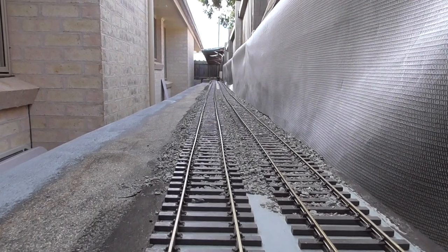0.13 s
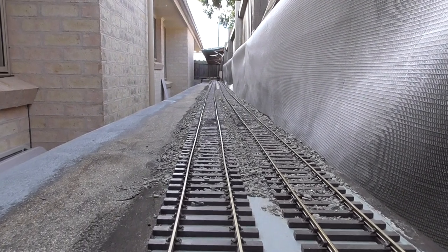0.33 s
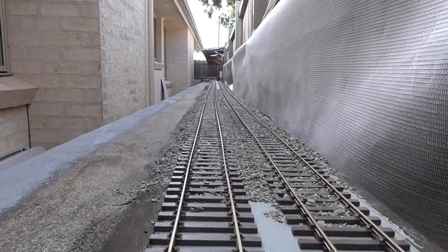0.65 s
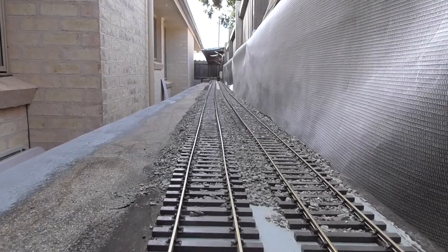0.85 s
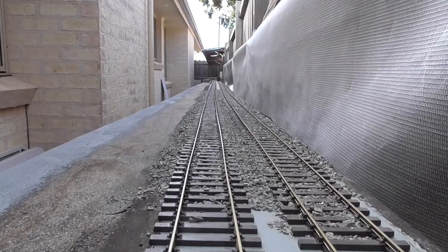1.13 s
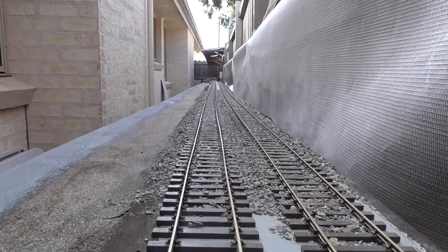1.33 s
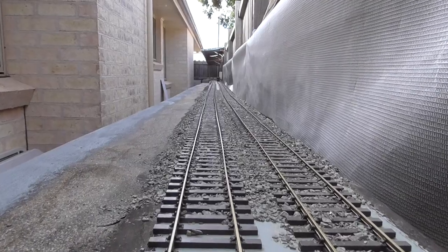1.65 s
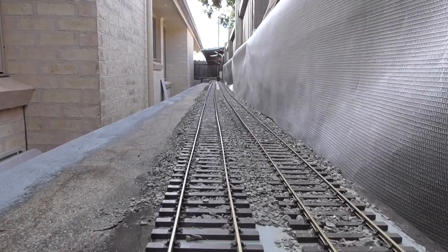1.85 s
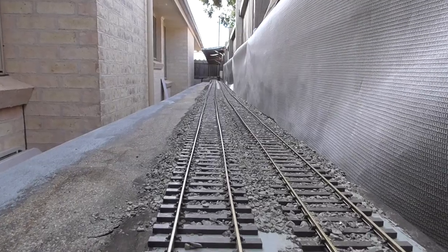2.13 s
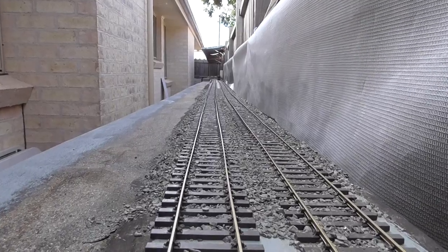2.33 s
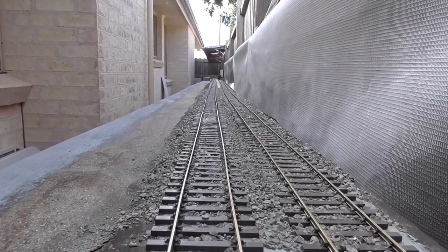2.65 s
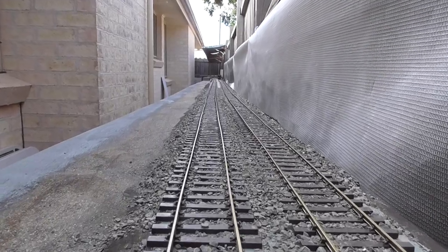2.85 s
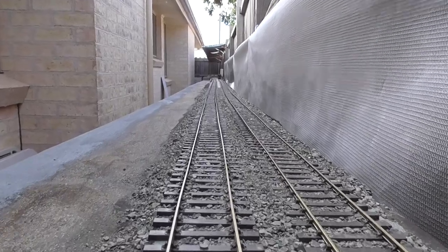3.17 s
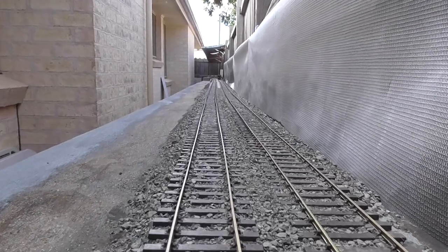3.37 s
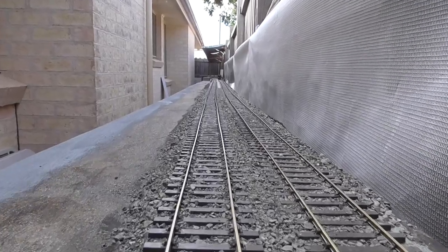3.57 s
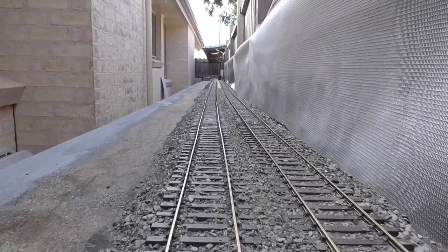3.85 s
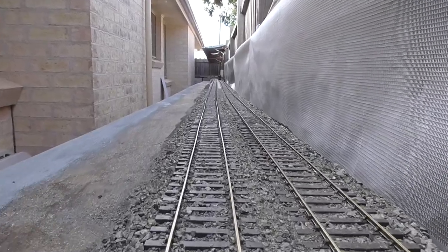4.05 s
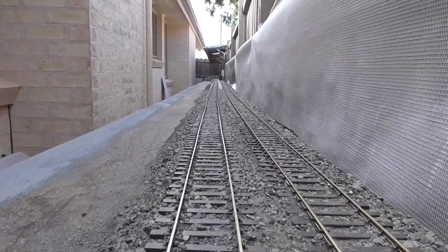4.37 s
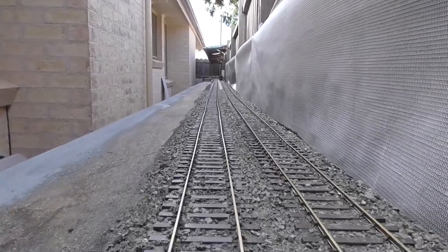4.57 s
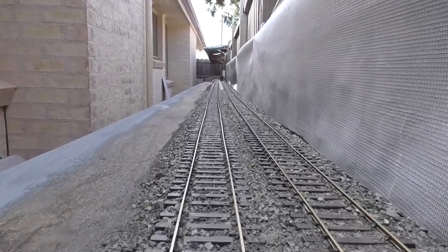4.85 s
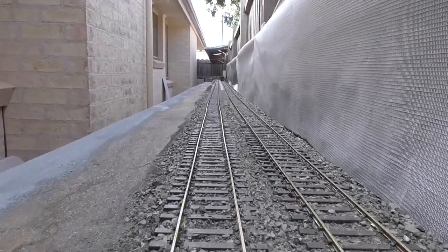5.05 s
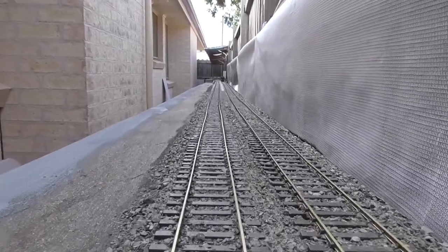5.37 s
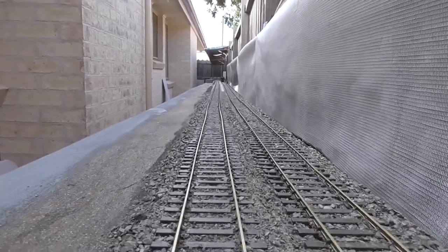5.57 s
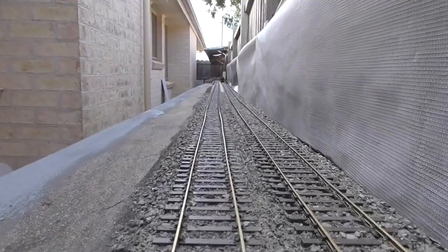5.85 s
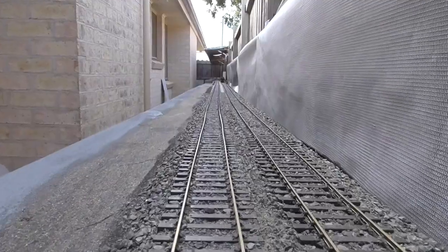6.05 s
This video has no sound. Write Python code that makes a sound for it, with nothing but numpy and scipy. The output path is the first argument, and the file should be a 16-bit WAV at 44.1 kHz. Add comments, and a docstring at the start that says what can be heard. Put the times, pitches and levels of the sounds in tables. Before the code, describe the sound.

Heard from aboard a miniature train, an engine purrs, revs up and settles while wheel rumble, gritty scrapes and metallic knocks steadily build.

```python
"""A garden track beside a brick wall: a small locomotive starts off, heard from a camera riding on the train.
Its engine, a sum of overtones of the working cycle, throbs at idle, pulls, then settles.
Filtered noise gives the wheels' rumble, louder through the wagon body as speed grows, and hissing grit.
Struck resonances give the knocks and ticks of couplings and rail joints; many small random blows give
a rolling noise. A steady faint low noise lies beneath; the camera adds hiss and a faint whine."""
import sys
import numpy as np
from scipy import signal
from scipy.fft import rfft, irfft, next_fast_len
from scipy.io import wavfile
from scipy.ndimage import uniform_filter1d

SR = 44100
rng = np.random.default_rng(int(sys.argv[2]) if len(sys.argv) > 2 else 0)


def pcm_store(signal):
    """Save signal as 16-bit PCM."""
    levels = np.round(np.clip(np.atleast_2d(signal), -1, 1) * 32767)
    wavfile.write(sys.argv[1], SR, levels.astype(np.int16).T)


N = 273861

# Levels of resonances and spectra are relative within their table.
# steady faint low noise: f/Hz, width/Hz, level/dB
LOW_NOISE = [(66, 34, 0)]
LOW_NOISE_DB = -61.5

# wheels: t/s, rumble level/dB, level of the ring near 2 kHz against the rumble/dB
ROLL = [(0.0, -41.5, -20.5), (1.17, -40.5, -19.5), (1.52, -35.5, -20.5), (2.0, -33, -22.5),
        (2.87, -31.5, -22.5), (3.13, -27.5, -23), (3.7, -28, -24), (3.95, -25.5, -22.5),
        (4.15, -22.5, -23.5), (4.6, -24, -21.5), (4.84, -20, -23.5), (5.05, -23, -22.5),
        (5.22, -22.5, -20.5), (5.45, -18.5, -21), (5.65, -21, -15.5), (5.86, -18.5, -19),
        (6.21, -21.5, -15.5)]
# response of the wagon body: f/Hz, level/dB
BODY = [(25, -65), (70, -25.5), (105, 0), (220, 1.5), (340, -3.5), (480, 1.5), (560, -4.5), (740, -5),
        (835, -8), (920, -8), (1100, -8), (1420, -14), (1680, -34.5), (2550, -42.5), (5000, -53),
        (16000, -56.5)]
# ringing of the wheels: f/Hz, width/Hz, level/dB
WHEEL_RING = [(1952, 230, 4), (2153, 140, -2)]
# booming of the wagon at speed: f/Hz, width/Hz, level/dB
BOOM = [(534.6, 123, 0.061), (718, 108, -2)]
BOOM_DB, BOOM_DB_PER_DB = -6.5, 1.05  # share at the loudest rumble, and its growth per dB of rumble

# resonances of the camera housing in the treble: f/Hz, width/Hz, level/dB
HOUSING = [(1950, 600, -5.5), (3350, 520, -4.5), (4617, 450, -0.5), (6110, 210, -2.5), (7410, 1630, -2),
           (9170, 1300, -3.5), (10500, 3600, -11)]
# thin chafing band: t/s, level/dB
CHAFE = [(0.0, -68), (1.17, -77), (1.226, -54), (1.33, -60.5), (1.46, -55.5), (1.57, -58), (1.63, -49),
         (1.68, -61), (2.07, -54.5), (2.78, -61), (3.08, -61), (4.26, -56.5), (5.2, -59.5), (5.5, -52),
         (5.83, -46.5), (6.21, -50.5)]
# resonances of the chafing: f/Hz, width/Hz, level/dB
CHAFE_RING = [(3290, 104, 5.5), (3304, 790, 0), (4770, 97, 2)]
# steady grit sets in as the wheels turn; levels before the weighting by band
GRIT_STILL_DB, GRIT_ROLLING_DB, GRIT_START_S, GRIT_FULL_S = -68, -56.5, 0.99, 1.34
GRIT_LOW_DB = -2  # weight of the steady grit's lowest band
# scrapes over grit: t of peak/s, peak level/dB, rise/s for 20 dB, fall/s for 20 dB (at least 5 ms each),
# weight of the lowest band/dB, centre f/Hz
SCRAPES = [(1.03, -37, 0.027, 0.04, 2.5, 7800), (1.41, -54, 0.074, 0, -2.5, 8500),
           (1.591, -52, 0.11, -0.14, -1, 8000), (1.925, -42, 0.068, 0.05, -1.5, 9400),
           (1.965, -41.5, 0.045, 0.1, 0.5, 9400), (2.103, -31, 0.013, .07, -8, 9100),
           (2.15, -39.5, 0.05, 0.05, -8, 8500), (2.226, -46, 0.012, -0.03, -11, 8000),
           (2.43, -49, 0.22, 0.06, 2.5, 7800), (2.67, -52, 0.2, 0, -1, 8000),
           (2.86, -58, 0.012, 0.1, -8, 8500), (3.422, -44.5, 0.008, 0.07, -6, 8200),
           (3.453, -42.5, 0.008, 0.06, -14, 9500), (3.515, -46, 0.01, 0.045, -14, 9000),
           (5.275, -54.5, 0.022, 0.3, -8, 9000), (5.445, -49.5, 0.025, 0.13, 1, 8500),
           (5.695, -43, 0.016, 0.07, -4, 8800), (5.88, -41, 0.1, 0.14, 5.5, 10500)]
# edges of the bands that crackle on their own: f/Hz
GRIT_EDGES = [5500, 7600, 9800, 12500]
SCRAPE_DB_PER_OCT2 = 17.5  # fall of a scrape per squared octave from its centre

# rolling noise near 1.1-1.4 kHz: t/s, level/dB
ROLLING_NOISE = [(1.2, -50.5), (2.0, -43.5), (2.5, -46.5), (3.1, -39.5), (3.6, -44.5), (4.1, -33.5),
                 (4.7, -39.5), (5.3, -32), (5.8, -27), (6.21, -29)]
BLOWS_PER_S, BLOW_SPREAD_DB = 1200, 1.5  # mean rate of its small blows, mean excess of their size
# resonances of the rolling noise and of the clack's low part: f/Hz, width/Hz, level/dB
LOW_RING = [(1118, 340, 1), (1346, 194, -1)]

# knocks: t/s, tick drive/dB, tick f/Hz, then drives/dB of the thud, low part of the clack, clack and clink
KNOCKS = [(0.068, -56, 7000, -24, -35, -44, -28), (0.3173, -43, 7000, -12.5, -33.5, -41, -40),
          (0.544, -40, 9200, -45, -51, -51, -60), (0.7492, -53, 9000, -24.5, -41, -53, -60),
          (1.1844, -54, 9000, -20.5, -43, -46, -55), (1.504, -50, 9000, -23, -42, -44, -50),
          (1.719, -50, 7500, -25, -31, -45, -50), (1.727, -50, 7500, -28, -30, -42, -50),
          (1.7394, -42, 8000, -26, -32, -30, -33), (1.7554, -16, 9300, -30, -18, -12, -12),
          (1.7603, -32, 8500, -40, -26, -28, -26), (1.7652, -30, 9500, -26, -27.5, -28, -27),
          (1.9795, -41, 9500, -19, -30, -35, -40), (2.139, -37, 9000, -15.5, -28.5, -34, -36),
          (2.336, -31, 8200, -31, -28.5, -32, -32), (3.022, -36, 7000, -27, -33, -33, -40),
          (3.087, -55, 7000, -26, -22.5, -32, -47), (3.226, -35, 8300, -42, -28, -33, -31),
          (3.272, -27.5, 7300, -19, -22, -30, -23.5), (3.348, -34, 7000, -15.5, -50, -56, -31),
          (3.513, -22.5, 8200, -16, -36, -41, -36), (3.722, -25, 9800, -29, -22, -32, -19),
          (3.946, -48, 9000, -13.5, -20.5, -35, -36), (4.0097, -33, 9400, -20, -27, -29, -31),
          (4.0972, -20, 9500, -17, -21.5, -32, -26), (4.107, -28, 9600, -9.5, -26, -28, -24),
          (4.1578, -46, 9000, -15, -22.5, -33, -40), (4.214, -30, 9900, -31.5, -36, -37, -42),
          (4.268, -36, 6960, -40, -40, -40, -33), (4.3366, -30, 9200, -8.5, -32, -29, -30),
          (4.6274, -48, 9000, -12, -26, -31, -37), (4.6382, -30.5, 8600, -30, -37, -34, -40),
          (4.668, -36, 9000, -17, -22, -33, -38), (4.9757, -30, 9600, -12, -25, -33, -29),
          (5.224, -52, 9000, -10, -26, -38, -42), (5.326, -42.5, 7500, -20, -21, -27, -32),
          (5.3387, -34, 6800, -8, -17, -30, -25), (5.379, -45, 9000, -12, -32, -39, -40),
          (5.455, -31, 8500, -12, -24, -24, -32), (5.7961, -37, 10000, -9, -12, -28, -28),
          (5.809, -32, 8800, -10, -19, -20, -20), (5.8334, -42, 8500, -13, -22, -26, -28),
          (5.8843, -22, 12000, -22, -14, -16.5, -15), (6.1789, -50, 7000, -18, -18, -26, -25)]
# modes of the wagon floor: f/Hz, width/Hz, level/dB
FLOOR = [(414, 210, 2.5), (770, 170, -2.5)]
# modes of the metal couplings: f/Hz, width/Hz, level/dB
COUPLING = [(2020, 330, 4), (2210, 1330, -9.5)]
# modes of a thinner metal part: f/Hz, width/Hz, level/dB
CLINK = [(3240, 510, 1), (4800, 260, -7.5), (5640, 3300, -26)]
# how strongly each part answers its drive
TICK_DB, THUD_DB, LOW_CLACK_DB, CLACK_DB, CLINK_DB = 13.5, 35.5, 38, 29.5, 20
BLOW = 2.5  # first blow against the dying noise that follows
DYING_MS = 18  # time in which that noise falls 60 dB
KNOCK_PAN_DB = 4  # spread of left minus right; the thud stays central
TICK_FOCUS = 1.81  # weight of the tick's own pitch beside its broad crack

# engine cycle: t/s, cycle rate f/Hz
ENGINE = [(0.0, 15.4), (1.15, 15.35), (1.38, 18.2), (1.59, 19.7), (1.76, 19.4), (1.84, 20.5), (2.15, 23.9),
          (2.29, 24.8), (2.55, 25.8), (2.7, 26.1), (3.54, 26.2), (4.14, 25.9), (4.64, 25.9), (5.25, 25.5),
          (5.6, 25.4), (6.21, 25.0)]
# load: t/s, state (0 idling, 1 pulling, 2 cruising)
LOAD = [(1.18, 0), (1.21, 1), (2.4, 1), (2.55, 2)]
# overtones at idle: multiple of the cycle, level/dB
IDLE = [(1, -50), (2, -43), (3, -41), (4, -38), (5, -25), (6, -16), (7, -26), (8, -10), (9, -8.5),
        (10, -7.5), (11, 1), (12, -6), (13, 1.5), (14, -6.5), (15, -12), (16, -9), (17, -9), (18, -12),
        (19, -31), (20, -19), (21, -17.5), (22, -30), (23, -23), (24, -16.5)]
# overtones when cruising: multiple of the cycle, level/dB
CRUISE = [(1, -52), (2, -34), (3, -26), (4, -18.5), (5, 1), (6, -8.5), (7, -6.5), (8, -4.5), (9, -15),
          (10, -8.5), (11, -21), (12, -9), (13, -19.5)]
# one heavy beat a cycle rings the frame under load: f/Hz, level/dB
PULL = [(18, -41), (60, -24), (100, -16), (115, -6), (138, -1), (200, 1), (250, -3), (310, -7), (400, -17),
        (600, -30)]
FIRING_DB, UPPER_DB = 2.5, -13  # under load: every fourth overtone lifted, those above the eighth lowered
# frame resonances added to the direct overtones: f/Hz, width/Hz, level of the added part/dB
FRAME = [(122, 15.5, 4.5), (385, 15.5, 7.5)]
# four firings of an idling cycle: place in the cycle (0-1), level/dB
FIRINGS = [(0, 0), (.25, -2), (.48, -7), (.72, -11)]
FIRST_BEAT_S = .037
# throb: t/s, level of the humming fifth overtone/dB, level of the others without the sixteenth/dB
THROB = [(0.0, -68, -32.5), (1.17, -61, -33.5), (1.21, -59, -25), (1.43, -45, -23.5), (1.6, -47, -23),
         (1.68, -51, -30), (1.75, -38, -23), (1.79, -38, -29.5), (1.9, -51, -18), (2.11, -24, -23.5),
         (2.4, -29.5, -20.5), (2.51, -27, -31), (3.2, -32, -27), (3.51, -25.5, -25.5), (4.1, -25.5, -29.5),
         (4.37, -20.5, -25), (4.8, -26, -30), (5.17, -26.5, -24.5), (5.5, -25.5, -25.5), (5.85, -38, -40),
         (6.21, -39, -27.5)]
WAVER_DB, WAVER_PER_S = 2.5, 12  # wavering of the throb once cruising
# flares of the sixteenth overtone: t of peak/s, peak level/dB, rise/s for 20 dB, fall/s for 20 dB
# (at least 5 ms each)
FLARES = [(2.08, -26.5, 0.13, 0.13), (2.75, -33, 0.39, 0.2), (2.96, -32, 0.055, -0.45),
          (4.1, -29, 0.31, 0.3), (5.17, -28.5, 0.24, -1.2)]
FLARE_FLOOR_DB = -45.5

# stereo width: f/Hz, level of side minus mid/dB
WIDTH = [(60, -29), (110, -50), (200, -1.5), (380, -8.5), (700, -14), (1290, -16.5), (2380, -17),
         (4400, 18), (8120, -63), (15000, 5)]
# stereo colour: f/Hz, level of left minus right/dB
TILT = [(60, -1.5), (110, 1.5), (200, 1.5), (380, -2), (700, -2.0), (1290, 0.5), (2380, -1), (4400, 2),
        (8120, 2), (15000, -4)]
# steady hiss of the camera: f/Hz, width/Hz, level/dB
HISS = [(3680, 1700, -1), (4680, 370, 2.5), (6210, 160, 7.5), (8900, 3000, -0.5), (11800, 4400, -4),
        (15650, 240, 3)]
HISS_DB = -62.5  # before the stereo colour
WHINE_HZ, WHINE_DB = 15683, -83
TOP_HZ = 15900  # edge of the top cut


def undb(db):
    """Amplitude ratio: the gain of a level in dB."""
    return 10 ** (np.asarray(db) / 20)


def unit(x):
    """Normalisation by mean power, to rms 1."""
    return x / np.sqrt(np.mean(x ** 2))


def curves(table):
    """Linear interpolation of a time table's columns, one value a sample."""
    s, *columns = np.transpose(table)
    return [np.interp(np.arange(N) / SR, s, c) for c in columns]


def shape(x, gain):
    """Minimum-phase filtering: the folded cepstrum makes a gain over Hz causal."""
    size = next_fast_len(N + 4096)
    hz = np.maximum(np.arange(2049) * SR / 4096, 1.)
    cepstrum = irfft(np.log(gain(hz) + 1e-9))
    cepstrum[1:2048] *= 2
    cepstrum[2049:] = 0
    response = irfft(np.exp(rfft(cepstrum)))
    return irfft(rfft(x, size) * rfft(response, size), size)[..., :N]


def slope(points):
    """Spectral envelope: gain interpolated over log frequency from (Hz, dB) points."""
    hz, db = np.transpose(points)
    return lambda f: undb(np.interp(np.log(f), np.log(hz), db))


def peaks(modes):
    """Superposed resonances: gain with steep skirts from (Hz, width, dB), powers added."""
    return lambda f: np.sqrt(sum(undb(2 * db) / (1 + (2 * (f - hz) / w) ** 2) ** 2 for hz, w, db in modes))


def walk(rate, size=N):
    """Slow random fluctuation: levels held 1 / rate of SR steps and slewed twice; spread near 1."""
    k = int(SR / rate)
    held = np.repeat(rng.standard_normal(size // k + 1), k)
    return 1.47 * uniform_filter1d(uniform_filter1d(held, k), k)[:size]


def spread(mid, side):
    """Mid-side stereo: two channels from a common and an unrelated part."""
    side = shape(side, slope(WIDTH))
    return np.array([mid + side, mid - side])


def swells(events):
    """Exponential growth and decay: each event's level climbs to a peak and drops linearly in dB."""
    t = np.arange(N) / SR
    total = 0
    for s, db, rise, fall in events:
        drops = np.where(t < s, (s - t) / max(rise, .005), (t - s) / max(fall, .005))
        total = total + undb(db - 20 * drops)
    return total


def low_noise():
    """Partly coherent noise through a low resonance: a steady faint low noise near 66 Hz."""
    common, *own = rng.standard_normal((3, N))
    return undb(LOW_NOISE_DB) * unit(shape(common + 0.96 * np.array(own), peaks(LOW_NOISE)))


def grit():
    """Friction noise in patchy bursts; its common part reaches one microphone later than the other."""
    bed_db, = curves([(GRIT_START_S, GRIT_STILL_DB), (GRIT_FULL_S, GRIT_ROLLING_DB)])
    bed = undb(bed_db + 0.72 * walk(12))
    chafe_db, = curves(CHAFE)
    grains = undb(2.0 * walk(500) + 0.62 * walk(40))
    common, *own = rng.standard_normal((3, N))
    pair = np.array(own) + 1.1 * np.array([np.roll(common, 26), common])  # left 26 samples late
    chafe = unit(shape(undb(2.0 * walk(150)) * pair, peaks(CHAFE_RING)))
    chafe = undb(chafe_db + 1.4 * walk(5.99)) * chafe
    hiss = unit(shape(grains * pair, peaks(HOUSING)))

    # differences of successive lowpasses are the bands
    under = []
    for hz in GRIT_EDGES:
        lowpass = signal.butter(4, hz, fs=SR, output="sos")
        under.append(signal.sosfiltfilt(lowpass, hiss))
    under.append(hiss)
    envelopes = [swells([row[:4]]) for row in SCRAPES]
    low_db, centre = np.transpose(SCRAPES)[4:]
    out = chafe + under[0] * (undb(GRIT_LOW_DB) * bed + undb(low_db) @ envelopes)
    for hz, below, above in zip(GRIT_EDGES, under, under[1:]):
        share = undb(-SCRAPE_DB_PER_OCT2 * np.log2(1.09 * hz / centre) ** 2)
        crackle = undb(2.1 * walk(120))
        out = out + (above - below) * crackle * (bed + share @ envelopes)
    return out


def rolling_noise():
    """Random impacts on a resonator: many small blows of uneven size make noise near 1.1-1.4 kHz."""
    db, = curves(ROLLING_NOISE)
    struck = rng.random(N) < BLOWS_PER_S / SR
    size = undb(BLOW_SPREAD_DB * rng.exponential(size=N)) * rng.standard_normal(N)
    soft = uniform_filter1d(struck * size, size=9)
    ringing = unit(shape(spread(soft, np.roll(soft, 900)), peaks(LOW_RING)))
    return undb(db + 0.58 * walk(4.66)) * ringing


def knocks():
    """Impact excitation: a blow and short dying noise ring the housing, floor and metal parts."""
    bursts = np.zeros((5, 2, N + 4000))
    ms = 1000 * np.arange(4000) / SR
    # the heavy floor feels only the blow, a soft push of about a millisecond
    push = np.exp(-ms / 0.29) * ms / 2.9
    for s, tick_db, hz, *drive_db in KNOCKS:
        pan_db = KNOCK_PAN_DB * rng.standard_normal()
        burst = rng.standard_normal(4000) * undb(-60 * ms / DYING_MS)
        burst[0] = BLOW
        burst = burst / np.sqrt(np.sum(burst ** 2))
        burst = burst * undb(np.array([[pan_db], [-pan_db]]) / 2)
        # a dulled blow drives the low part of the clack
        dull = uniform_filter1d(burst, size=11, origin=5)
        thin = burst / 2 + TICK_FOCUS * signal.lfilter(*signal.iirpeak(hz, 5, fs=SR), burst)
        start = int(s * SR)
        for part, drive, db in zip(bursts, (thin, push, dull, burst, burst), [tick_db] + drive_db):
            part[:, start:start + 4000] += drive * undb(db)

    modes = (HOUSING[3:], FLOOR, LOW_RING, COUPLING, CLINK)
    tick, thud, low_clack, clack, clink = (shape(b[:, :N], peaks(m)) for b, m in zip(bursts, modes))
    thud = signal.sosfilt(signal.butter(2, 150, "high", fs=SR, output="sos"), thud)
    metal = undb(CLACK_DB) * clack + undb(LOW_CLACK_DB) * low_clack + undb(CLINK_DB) * clink
    return undb(TICK_DB) * tick + undb(THUD_DB) * thud + metal


def wheels(turn):
    """Forced vibration: rough tread jolts the wagon body unevenly, a little in step with the engine."""
    db, ring_db = curves(ROLL)
    jolts = undb(1.17 * walk(300) + 0.5 * walk(30) + 0.12 * np.cos(4 * turn))
    rough = spread(*unit(jolts * rng.standard_normal((2, N))))
    rumble = unit(shape(rough, slope(BODY)))
    ring = unit(shape(rough, peaks(WHEEL_RING)))
    boom = unit(shape(rough, peaks(BOOM)))
    boom_db = BOOM_DB + BOOM_DB_PER_DB * (db - db.max()) + 2.75 * walk(25)
    return undb(db) * (rumble + undb(boom_db) * boom + undb(ring_db) * ring)


def engine():
    """Harmonic synthesis: wavering, drifting overtones of the cycle, coloured by load and frame resonance."""
    hz, = curves(ENGINE)
    hum_db, db = curves(THROB)
    turn = 2 * np.pi * np.cumsum(hz * (1 + 0.003 * walk(12))) / SR
    turn = turn - turn[int(FIRST_BEAT_S * SR)]
    place, size_db = np.transpose(FIRINGS)
    step = 64  # samples between updates of the overtones' gains and phases
    load = curves(LOAD)[0][::step]
    idling, cruising = np.clip(1 - load, 0, 1), np.clip(load - 1, 0, 1)
    cruise_levels = dict(CRUISE)
    orders, power = 0, 0
    for k, idle_db in IDLE:
        if k in (5, 16):  # these two follow their own levels below
            continue
        f = k * hz[::step]
        pull = slope(PULL)(f) * undb(FIRING_DB * (k % 4 == 0) + UPPER_DB * (k > 8))
        cruise = undb(cruise_levels.get(k, -40))
        gain = idling * undb(idle_db) + cruising * cruise + (1 - idling - cruising) * pull
        gain = gain * (1 + peaks(FRAME)(f))
        power = power + gain ** 2 / 2
        phase = (0.6 + 0.4 * cruising) * walk(4 * step, size=len(f))
        # away from idle the upper overtones take fixed random phase offsets
        phase = phase + (1 - idling) * (k > 8) * rng.uniform(-np.pi, np.pi)
        # at idle each overtone takes its timing from the uneven firings
        firing_sum = np.sum(undb(size_db) * np.exp(-2j * np.pi * k * place))
        phase = phase + idling * np.angle(firing_sum)
        waver = gain * undb((0.9 + 0.055 * k) * walk(6 * step, size=len(f)))
        orders = orders + np.repeat(waver, step)[:N] * np.cos(k * turn + np.repeat(phase, step)[:N])

    waver_db = WAVER_DB * np.repeat(cruising, step)[:N] * walk(WAVER_PER_S)
    throb = undb(db + waver_db) * orders / np.repeat(np.sqrt(power), step)[:N]
    # the fifth overtone hums; the sixteenth flares now and then
    flare = undb(FLARE_FLOOR_DB + 3.0 * walk(9.5)) + swells(FLARES)
    throb = throb + np.sqrt(2) * (undb(hum_db) * np.cos(5 * turn) + flare * np.cos(16 * turn))
    late = np.pad(throb, (8, 0), "edge")[:N]  # right channel, 8 samples later
    return np.array([throb * undb(-1.5), late * undb(-0.96)]), turn


def scene():
    """Superposition: low noise, grit, rolling noise, knocks, wheels and engine add."""
    throb, turn = engine()
    return low_noise() + grit() + rolling_noise() + knocks() + wheels(turn) + throb


def record(dry):
    """Transduction: two microphones of unlike colour, with added hiss, a faint whine and a top cut."""
    half = np.array(TILT) * [1, .5]
    hiss = undb(HISS_DB) * unit(shape(rng.standard_normal((2, N)), peaks(HISS)))
    left = shape(dry[0] + hiss[0], slope(half))
    right = shape(dry[1] + hiss[1], slope(half * [1, -1]))
    whine = undb(WHINE_DB) * np.sin(2 * np.pi * WHINE_HZ * np.arange(N) / SR)
    wet = np.array([left, right]) + whine
    return signal.sosfilt(signal.ellip(10, .2, 70, TOP_HZ, fs=SR, output="sos"), wet)


dry = scene()
out = record(dry)
pcm_store(out)
```